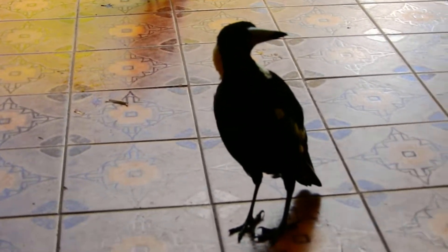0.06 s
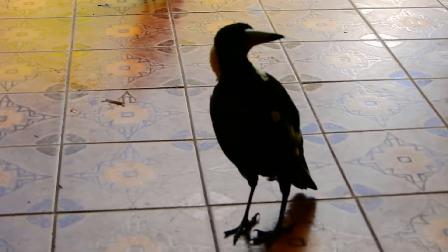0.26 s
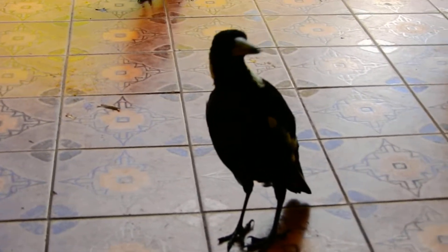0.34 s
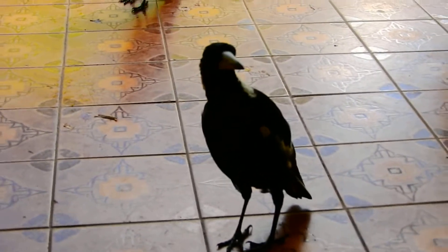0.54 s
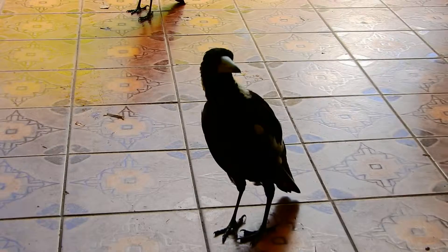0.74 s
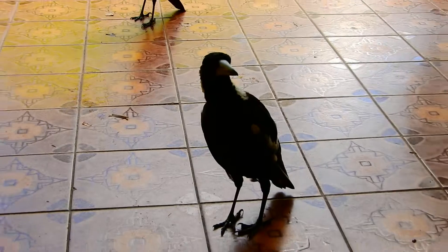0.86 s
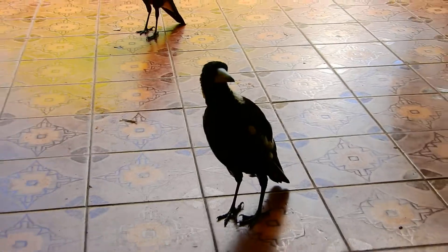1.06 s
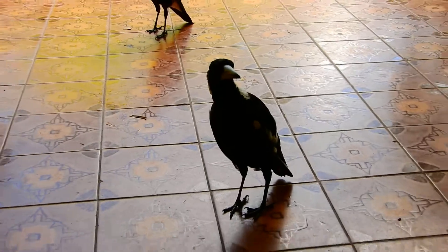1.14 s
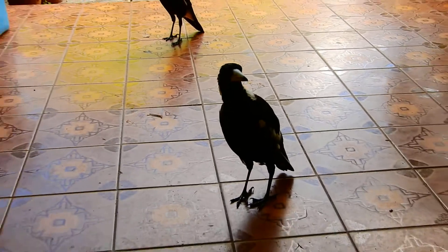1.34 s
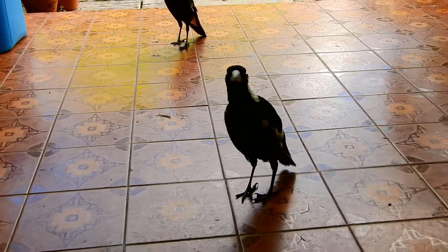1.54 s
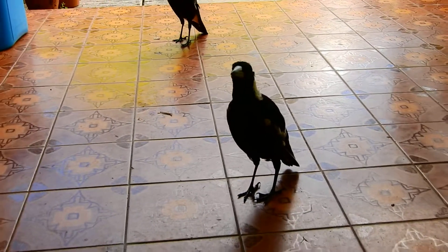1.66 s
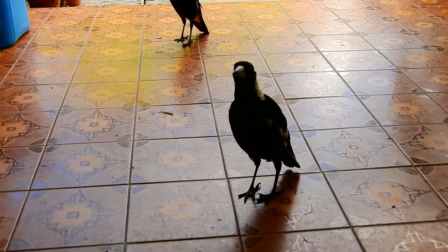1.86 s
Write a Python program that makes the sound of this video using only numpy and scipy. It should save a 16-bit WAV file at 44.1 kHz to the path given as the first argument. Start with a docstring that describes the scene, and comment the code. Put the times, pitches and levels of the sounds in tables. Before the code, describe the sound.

One close, raspy magpie squawk on a patio, then faint high chirps and light taps.

```python
"""A tiled, roofed patio. A magpie close by gives one squawk: a fluttering harmonic tone that swells,
brightens through throat and beak resonances and breaks into a rasp. Small birds whistle thin chirps
further off. Light knocks ring the modes of something hollow, with a few sharp ticks and faint scuffing.
Floor and walls add echoes and a short tail. Behind it all: low rumble, soft bumps, a steady high hiss."""
import sys
import numpy as np
from scipy import signal
from scipy.fft import rfft, irfft
from scipy.io import wavfile
from scipy.ndimage import uniform_filter1d

SR = 44100
rng = np.random.default_rng(int(sys.argv[2]) if len(sys.argv) > 2 else 0)


def materialize(psi):
    """Save the field psi as 16-bit PCM at rate SR to the path in sys.argv[1].

    A 1-D psi becomes a single channel; in a 2-D psi each row is a channel.
    """
    bounded = np.clip(np.atleast_2d(psi).T, -1, 1)
    quanta = np.round(bounded * 32767).astype(np.int16)
    wavfile.write(sys.argv[1], SR, quanta)


N = 83790
T = np.arange(N) / SR

# Stereo width of noise. Each row: frequency in Hz, left-right correlation.
CORRELATION = [(60, 1), (250, 0.79), (1000, 0.48), (2500, 0.64), (5000, 0.58), (8000, 0.19), (12000, 0)]


def magpie_squawk():
    """A tone flutters in pitch and level; with roughness its cycles stray and hoarse noise grows."""
    # Each row: time in seconds, pitch in Hz, roughness 0-1.
    voice = [(.19, 869.8, 0.17), (.21, 914.7, 0.17), (.245, 931, 0.19), (.293, 919.5, 0.09),
             (.31, 900.6, .75), (.328, 864.3, .6), (.352, 858.4, 0.49), (.375, 814.7, 0.86)]
    # Each row: time in seconds, main tone level in dB, treble level in dB.
    effort = [(0.19, -42, -65), (0.204, -22, -45), (0.246, -14.5, -21.5), (0.292, -8.5, -13.5),
              (0.334, -17.5, -15), (0.346, -13, -16), (0.378, -26.5, -25)]
    # Each row: time in seconds, level of the weak fundamental in dB.
    fundamental_levels = [(.19, -63), (.205, -34.5), (.235, -42), (.27, -34), (.305, -34.5), (.343, -25.5),
                          (.378, -38)]
    # Resonances. Each row: frequency in Hz, relative gain in dB.
    throat_and_beak = [(2200, 6), (2650, 4.5), (2950, -11), (3150, -16), (3400, -0.5), (3650, 3.5),
                       (4000, -6.5), (4450, 3.5), (4750, -2.5), (5450, 4), (5850, 6.5), (6150, 1.5),
                       (6600, -8), (7500, -2), (8700, -9.5), (9750, 6), (10600, -2.5), (11800, -6.5),
                       (12400, -6)]
    nasal_resonance = [(2900, -28), (3150, -9.5), (3400, 1), (3530, 4), (3720, -1), (4000, -32),
                       (4600, -30)]
    hoarse_spectrum = [(600, -18), (850, -1.5), (1150, -20), (1450, -1), (1750, 2.5), (2100, -4),
                       (2700, -19), (3000, -24)]
    attack_s, release_s = 0.0021, 0.023
    flutter_per_pitch, stereo_phase_rad = 0.181, 0.15

    pitch_hz, rough = envelopes(voice)
    main_db, treble_db = envelopes(effort)
    fundamental_db, = envelopes(fundamental_levels)
    attack = np.clip(1 + (T - effort[0][0]) / attack_s, 0, 1)
    release = np.exp(-np.maximum(T - effort[-1][0], 0) / release_s)

    flutter_hz = flutter_per_pitch * pitch_hz * (1 + 0.21 * rough * drift(87))
    arches = np.abs(np.sin(np.pi * np.cumsum(flutter_hz) / SR))
    flutter = (arches - 2 / np.pi) * np.pi / np.sqrt(2)   # zero mean
    hz = pitch_hz * (1 + 0.11 * flutter + 0.0628 * rough * drift(440))
    phase = 2 * np.pi * np.cumsum(hz) / SR
    shimmer_db = 4 * rough
    pulsing = np.maximum(1 + 0.22 * flutter, 0) * from_db(shimmer_db * np.tanh(drift(370)))

    fundamental = np.sqrt(2) * from_db(shimmer_db * np.tanh(drift(180))) * np.sin(phase)
    second = from_db(-0.5) * np.sqrt(2 - rough) * pulsing * np.sin(2 * phase)   # leading harmonic
    fourth = from_db(-17) * levelled(coloured(pulsing * np.sin(4 * phase), nasal_resonance))
    hoarse = from_db(-10.5) * 2 * rough * noise(hoarse_spectrum, CORRELATION, pulsing)
    low = from_db(fundamental_db) * fundamental + from_db(main_db) * (second + fourth + hoarse)

    stereo_phase = np.array([phase, phase + stereo_phase_rad])
    buzz = sum(np.sin(k * stereo_phase) for k in range(3, 15))
    overtones = from_db(-4) * levelled(coloured(pulsing * buzz, throat_and_beak))
    rasp = from_db(-3) * noise(throat_and_beak, correlation=[(1000, 0.65)], pulsing=pulsing)
    return attack * release * (pan(low, left_db=-0.2) + from_db(treble_db) * (overtones + rasp))


def hollow_knocks():
    """Each knock rings the same hollow body, every mode with a strength of its own."""
    # Each row: start in seconds, level in dB, extra low ring in dB, extra bright crack in dB.
    hits = [(.003, -32.5, 9, -4.5), (0.074, -39, 9, 5.5), (.131, -41.5, -7, -10), (0.243, -9, -5, -9),
            (.313, -13.5, -0.5, -8), (.368, -13, -6, 8), (0.5961, -24, -15, -9), (.620, -26, -0.5, 9),
            (1.2645, -20.5, -0.5, 1), (1.339, -41, 9, 1), (1.567, -32, 0, -10), (1.664, -36, 7.5, -12),
            (1.723, -33, -7.5, -11), (1.776, -34, -6, -9)]
    # Each row: frequency in Hz, gain in dB, T60 in seconds.
    body_modes = [(149.4, -12.5, 0.05), (262.7, -12, 0.37), (364, -14, 0.082), (749, -13.5, 0.056),
                  (1054, -3.5, 0.03), (1287, 0.5, 0.012), (1870, -6, 0.016), (2470, -6, 0.0095)]
    ring_below_hz, crack_above_hz = 500, 1500
    start_s, hit_db, ring_db, crack_db = np.transpose(hits)
    scatter_db = rng.normal(0, 1, (len(hits), len(body_modes)))
    out = 0
    for k, (hz, mode_db, t60_s) in enumerate(body_modes):
        is_low, is_bright = hz < ring_below_hz, hz > crack_above_hz
        db = hit_db + mode_db + scatter_db[:, k] + ring_db * is_low + crack_db * is_bright
        out = out + (-1) ** k * pan(struck_mode(start_s, db, hz, t60_s), left_db=-2 * is_low)
    return out


def tile_ticks():
    """Small hard contacts on the tiles ring brief, high modes."""
    # Each row: start in seconds, level in dB, extra treble in dB.
    hits = [(0.63, -18, -10), (.637, -28, -3), (1.272, -44, 19), (1.58, -43, 13)]
    # Each row: frequency in Hz, gain in dB, T60 in seconds.
    modes = [(4500, -3, 0.011), (4800, -0.5, 0.0052), (7600, -5, 0.011), (10400, -6.5, 0.0033)]
    treble_above_hz = 7000
    start_s, hit_db, treble_db = np.transpose(hits)
    return sum(struck_mode(start_s, hit_db + mode_db + treble_db * (hz > treble_above_hz), hz, t60_s)
               for hz, mode_db, t60_s in modes)


def far_chirps():
    """Small birds: thin, wavering whistles that glide between two pitches."""
    # Each row: start in seconds, length in seconds, start pitch in Hz, end pitch in Hz, level in dB.
    calls = [(-.01, 0.055, 5950, 6080, -40.5), (0.019, 0.11, 6350, 6320, -43),
             (0.094, 0.074, 6480, 6350, -36), (0.058, .13, 4920, 4790, -51.5),
             (0.157, .05, 6380, 6340, -50), (0.438, 0.083, 5720, 5700, -43),
             (0.492, 0.044, 3800, 3770, -42.5), (0.512, 0.019, 5200, 5220, -37),
             (.538, 0.033, 6000, 6300, -35.5), (.57, 0.0356, 6250, 6170, -40.5),
             (0.583, 0.025, 4650, 4670, -35.5), (0.609, 0.0077, 5100, 5140, -37),
             (1.279, 0.046, 5000, 4880, -46.5)]
    waver = 1 + 0.01803 * drift(263)
    out = 0
    for start_s, length_s, start_hz, end_hz, db in calls:
        progress = np.clip((T - start_s) / length_s, 0, 1)
        hz = (start_hz + (end_hz - start_hz) * progress) * waver
        arch = np.sqrt(np.abs(np.sin(np.pi * progress)))
        out = out + from_db(db) * arch * np.sin(2 * np.pi * np.cumsum(hz) / SR)
    return out


def scuffs():
    """Soft, uneven rubbing between the later knocks."""
    # Each row: time in seconds, level in dB.
    levels = [(1.28, -66), (1.31, -60), (1.36, -46.5), (1.42, -56), (1.5, -55), (1.63, -72), (1.68, -45.5),
              (1.73, -59.5), (1.77, -68)]
    # Each row: frequency in Hz, relative gain in dB.
    spectrum = [(250, 5), (360, 6), (550, -8.5), (1200, 1.5), (2200, -15), (3200, -9), (4800, -11),
                (9000, -31)]
    db, = envelopes(levels)
    return from_db(db + 3 * drift(60)) * noise(spectrum, CORRELATION)


def with_echoes(x):
    """Direct sound plus first reflections off floor and walls."""
    # Each row: left delay in seconds, right delay in seconds, gain in dB.
    reflections = [(.00135, 0.0014, -17), (.0058, .0066, -17), (0.0119, 0.014, -17.5)]
    out = x
    for *delays_s, db in reflections:
        delayed = [np.interp(T - delay_s, T, channel, left=0) for delay_s, channel in zip(delays_s, x)]
        out = out + from_db(db) * np.array(delayed)
    return out


def patio_reverb(x):
    """Diffuse tail, decaying band by band, different in each ear."""
    # Each row: frequency in Hz, T60 in seconds.
    decay_times = [(200, 0.22), (800, 0.29), (2000, 0.38), (5500, 0.43), (11000, 0.22)]
    predelay_s, edges_hz = 0.0071, np.geomspace(100, 16000, 9)
    t, tail = T[:SR], 0
    for low_hz, high_hz in zip(edges_hz, edges_hz[1:]):
        bandpass = signal.butter(2, [low_hz, high_hz], "band", fs=SR, output="sos")
        band = signal.sosfilt(bandpass, rng.standard_normal((2, SR)))
        t60_s = at_hz(decay_times, np.sqrt(low_hz * high_hz))
        tail = tail + band * from_db(-60 * t / t60_s)
    tail = unit_rms(tail * (t > predelay_s)) / np.sqrt(SR)
    return signal.fftconvolve(np.broadcast_to(x, (2, N)), tail, axes=1)[:, :N]


def background():
    """Uneven outdoor rumble, a steady hiss and a few soft, low bumps."""
    # Each row: frequency in Hz, relative spectral density in dB.
    rumble_spectrum = [(38, -17), (60, 0.5), (92, -1.5), (160, -4.5), (215, -13.5), (260, -13),
                       (330, -18.5), (600, -35.5)]
    hiss_spectrum = [(290, -52), (500, -8.5), (579, -6), (679, -16.5), (786, -3.5), (910, -9.5), (1190, -3),
                     (1450, -11.5), (2020, -5), (3540, -12.5), (3940, -5.5), (6030, -4.5), (6530, 0),
                     (7870, -1.5), (12000, -21), (15700, -49), (22000, -120)]
    # Each row: time in seconds, rumble offset in dB, hiss offset in dB.
    swell = [(0, 3, 0), (.6, -0.5, 2), (.9, 1, .5), (1.2, -2.5, 1), (1.45, 0, 0), (1.7, -0.5, -0.5),
             (1.9, -1.5, -1.5)]
    # Each row: start in seconds, level in dB.
    bumps = [(1.051, -34), (1.335, -32.5), (1.598, -27.5)]
    rumble_swell_db, hiss_swell_db = envelopes(swell)
    rumble = from_db(-44.5 + rumble_swell_db + 2 * drift(12)) * noise(rumble_spectrum, CORRELATION)
    hiss = from_db(-45 + hiss_swell_db + 0.04 * drift(3.3)) * noise(hiss_spectrum, CORRELATION)
    return rumble + hiss + struck_mode(*np.transpose(bumps), hz=70, t60_s=0.1)


def struck_mode(start_s, db, hz, t60_s):
    """A two-pole resonator driven by one impulse per hit."""
    impulses = np.full(N, 1e-18)
    impulses[np.clip(start_s * SR, 0, N - 1).astype(int)] = from_db(db)
    radius, angle = from_db(-60 / (t60_s * SR)), 2 * np.pi * hz / SR
    return signal.lfilter([0, np.sin(angle)], [1, -2 * radius * np.cos(angle), radius ** 2], impulses)


def noise(spectrum, correlation, pulsing=1):
    """Stereo noise, optionally pulsed, then coloured."""
    mid, side = rfft(rng.standard_normal((2, N)))
    alike = np.clip(at_hz(correlation, np.arange(N // 2 + 1) * SR / N), -1, 1)
    white = irfft(np.sqrt(1 + alike) * mid + np.sqrt(1 - alike) * side * [[1], [-1]], N)
    return coloured(pulsing * white, spectrum)


def coloured(x, spectrum):
    """Filter by a table, falling steeply past its ends; unit RMS."""
    hz = np.arange(N // 2 + 1) * SR / N + 1
    skirts = 1 / (1 + (spectrum[0][0] / hz) ** 8) / (1 + (hz / spectrum[-1][0]) ** 16)
    return unit_rms(irfft(rfft(x) * from_db(at_hz(spectrum, hz)) * skirts, N))


def levelled(x):
    """Hold the level steady as the pitch crosses resonances."""
    return x / np.sqrt(uniform_filter1d(x ** 2, size=800) + 1e-9)


def drift(rate_hz):
    """Smooth random motion, unit RMS."""
    pole = np.exp(-2 * np.pi * rate_hz / SR)
    return unit_rms(signal.lfilter([1], [1, -2 * pole, pole ** 2], rng.standard_normal(2 * N))[N:])


def envelopes(rows):
    """Interpolate each column after the time column to every sample."""
    time_s, *columns = np.transpose(rows)
    return [np.interp(T, time_s, column) for column in columns]


def at_hz(rows, hz):
    """Read a table on a log-frequency axis."""
    row_hz, values = np.transpose(rows)
    return np.interp(np.log(np.maximum(hz, 1)), np.log(row_hz), values)


def pan(x, left_db):
    """Opposite gains left and right."""
    return x * from_db([[left_db], [-left_db]])


def from_db(db):
    """Decibels to gain."""
    return 10 ** (np.asarray(db) / 20)


def unit_rms(x):
    """Scale to unit power."""
    return x / np.sqrt(np.mean(x ** 2) + 1e-20)


def scene():
    """Birds and taps feed the patio's reverb; scuffs and background stay dry."""
    squawk = magpie_squawk()
    taps = pan(hollow_knocks() + tile_ticks(), left_db=-0.2)
    chirps = far_chirps()
    tail = patio_reverb(from_db(-11.5) * squawk + from_db(-15) * taps + from_db(-2.5) * chirps)
    return with_echoes(squawk) + taps + chirps + tail + scuffs() + background()


def record(dry):
    """Soft peak limit, then a steep low-pass."""
    ceiling, stopband_hz = 0.9, 14500
    rounded = dry / (1 + (dry / ceiling) ** 8) ** (1 / 8)
    return signal.sosfilt(signal.cheby2(12, 70, stopband_hz, fs=SR, output="sos"), rounded)


dry = scene()
out = record(dry)
materialize(out)
```